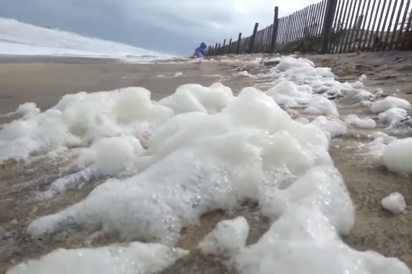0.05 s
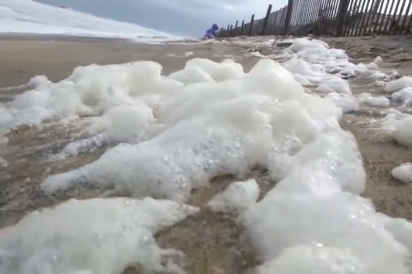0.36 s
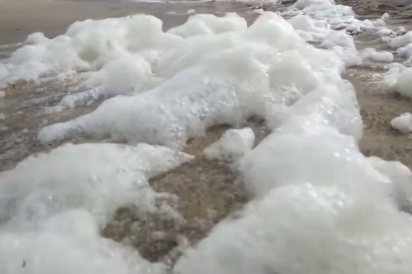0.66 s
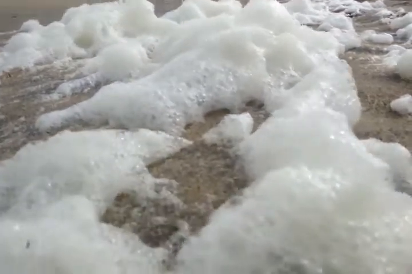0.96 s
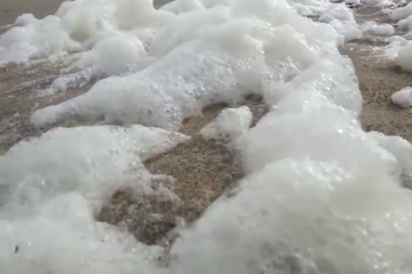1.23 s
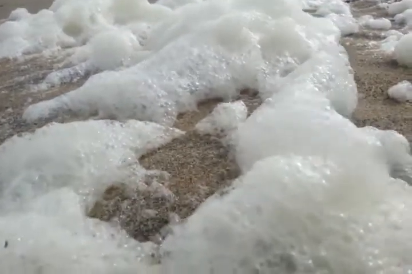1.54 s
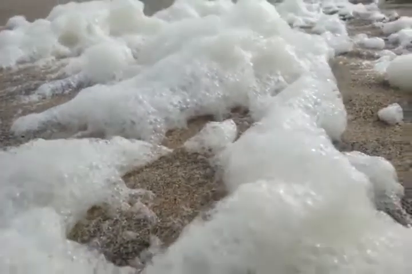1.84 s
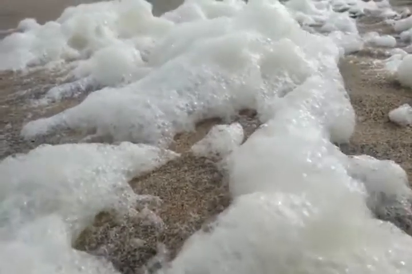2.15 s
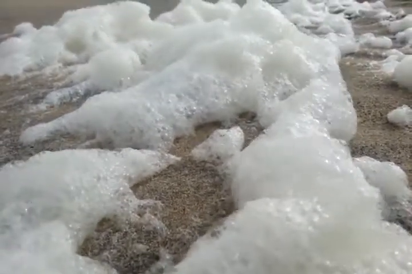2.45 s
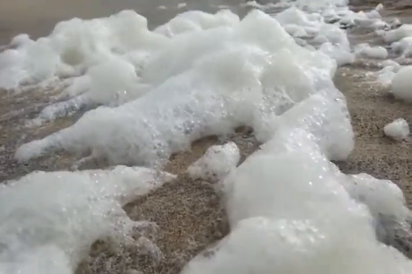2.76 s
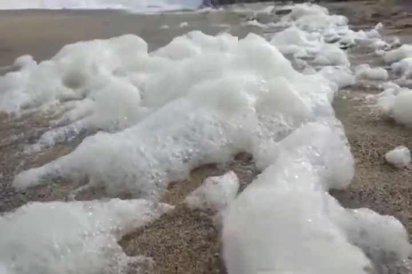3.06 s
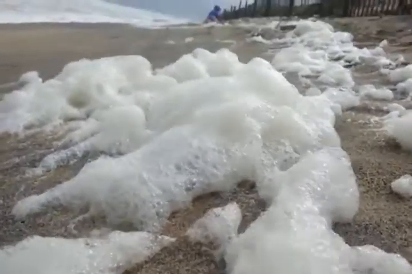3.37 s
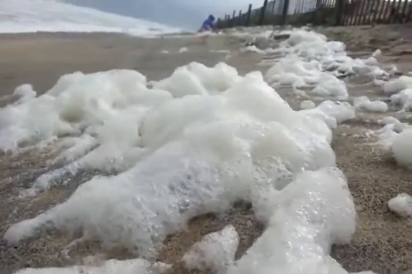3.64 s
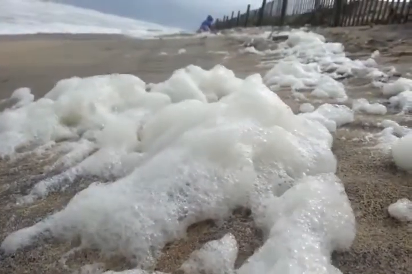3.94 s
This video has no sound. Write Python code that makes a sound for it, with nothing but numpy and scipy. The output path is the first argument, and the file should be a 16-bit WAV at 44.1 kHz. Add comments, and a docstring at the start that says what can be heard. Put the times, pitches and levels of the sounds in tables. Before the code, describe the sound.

Strong wind roars and thumps against the microphone while surf hisses faintly in the background.

```python
"""On an open beach, gusty wind buffets the two microphone ports of a camera held low over sea foam.
Eddies roar at each port, louder and higher the faster they pass. Sharp blasts slap and crackle,
large eddies thump the right port, and the hardest blasts overload the recorder.
Behind them the hiss of the surf swells and fades, ringing in the ports near 4.5 kHz."""
import sys
import numpy as np
from scipy import signal
from scipy.fft import rfft, irfft, next_fast_len
from scipy.io import wavfile
from scipy.ndimage import map_coordinates

SR = 44100
rng = np.random.default_rng(int(sys.argv[2]) if len(sys.argv) > 2 else 0)


def transcribe(u):
    """Save the signal u as a 16-bit wav file named by the first command-line argument.

    u: samples, shape (n,) or (channels, n), limited to [-1, 1]; the rate is SR.
    q: integer samples, one column per channel.
    """
    v = np.clip(np.atleast_2d(u).T, -1, 1)
    q = np.round(v * 32767).astype(np.int16)
    wavfile.write(sys.argv[1], SR, q)


N = 176400
LEFT, RIGHT = 0, 1

# Sharp blasts of wind. Each row: time in seconds, port, relative strength, half width in seconds.
BLASTS = [(.009, 0, 0.38, .002), (.024, 0, .6, .003), (0.041, 0, 0.67, .008), (.118, 0, 1.14, 0.0041),
          (.175, 0, 0.66, 0.0019), (0.206, 1, 0.56, 0.0021), (.232, 0, 0.66, 0.0037),
          (.24, 0, 0.99, 0.0039), (.252, 0, 0.65, 0.0021), (.287, 0, 0.88, .002),
          (.292, 0, 0.6504, 0.004026), (.331, 0, 0.81, .008), (.338, 0, 0.94, 0.003007),
          (.392, 0, 0.59, .01), (.431, 0, 0.84, 0.0032), (.439, 0, 0.56, 0.00308), (.515, 0, 0.48, .003),
          (.54, 0, .9, .004), (0.595, 0, 0.48, 0.0033), (.609, 0, 0.78, 0.0041), (.678, 1, 0.74, 0.0029),
          (.694, 0, 0.78, .003), (.709, 0, 0.52, 0.0042), (.761, 0, 0.68, 0.0055), (.793, 0, .6, .005),
          (.805, 1, 0.49, 0.0018), (.879, 1, 0.46, .003), (.931, 0, 0.63, 0.0041), (.937, 1, .55, 0.0019),
          (.952, 0, 0.69, 0.0044), (1.088, 1, 0.54, 0.0028), (1.117, 0, 0.67, 0.0032),
          (1.142, 0, .85, 0.0051), (1.251, 0, 0.48, 0.0028), (1.265, 0, 0.79, 0.0042),
          (1.361, 1, 0.66, 0.0019), (1.489, 1, 0.56, 0.0031), (1.571, 0, 0.57, 0.0032),
          (1.608, 1, 1.03, .004), (1.646, 1, 0.66, 0.0029), (1.719, 1, 0.42, .003),
          (1.822, 0, 0.54, 0.0029), (1.828, 1, 0.91, 0.0031), (1.893, 1, 0.6, 0.0049),
          (1.921, 1, 0.49, 0.0034), (2.146, 1, 0.52, 0.0027), (2.166, 1, 0.57, 0.0035),
          (2.23, 1, .88, 0.001999), (2.237, 1, .7, 0.0018), (2.2705, 1, 1.19, 0.0012),
          (2.336, 1, .8, 0.0018), (2.4, 1, 0.61, .003), (2.466, 1, 0.51, 0.0041), (2.682, 1, 0.49, .003),
          (2.704, 1, 0.99, 0.0049), (2.775, 1, 0.7, 0.0038), (2.902, 1, 0.87, 0.0031),
          (2.937, 0, 0.78, .003), (2.967, 0, 0.44, 0.0082), (2.994, 1, 0.72, 0.0019),
          (3.043, 0, .4, 0.0051), (3.061, 0, 0.439, 0.0039), (3.082, 0, 0.42, .004),
          (3.119, 0, .55, 0.0059), (3.163, 0, .45, .006), (3.182, 0, 0.48, 0.0042),
          (3.215, 0, 0.39, 0.0048), (3.278, 1, 0.69, .003), (3.284, 0, 0.43, 0.0032),
          (3.379, 0, 0.38, .003), (3.646, 1, 0.58, 0.0038), (3.816, 1, .45, 0.0029)]


def buffet(port):
    """Eddies sweep past one port: faster air is louder and shifts the roar upwards."""
    # The air stream at each port. Each row: time in seconds, level in dB, relative speed.
    left_air = [(0, -14.5, 1.415), (.18, -13.5, 1.186), (.3, -14, 1.403), (.7, -10.5, 1.3),
                (.87, -13.5, 1.09), (1.15, -13, 1.09), (1.45, -14.5, .93), (1.75, -12, 1),
                (2.05, -16.5, 0.78), (2.33, -15, 0.9), (2.42, -22.5, 0.89), (2.52, -17.5, 0.74),
                (2.67, -19, 0.8), (2.76, -14, 1.14), (3, -13.5, 1.314), (3.17, -10, 1.306), (3.3, -15, 1.1),
                (3.7, -13, 0.71), (3.87, -23.5, 0.7), (4, -13.5, 0.79)]
    right_air = [(0, -11.5, 0.9), (.45, -12, 0.88), (.72, -10.5, 1.12), (1.05, -13.5, 1.097),
                 (1.36, -9.5, .96), (1.62, -11.5, 1.034), (1.75, -10.5, 0.74), (1.85, -10, 0.88),
                 (2.22, -10, .94), (2.44, -10, 0.89), (2.52, -9, .75), (2.7, -10, 1.07), (3, -10.5, 1.08),
                 (3.35, -11.5, 0.96), (3.56, -10.5, 0.71), (3.66, -9.3, .76), (3.74, -9.5, 0.71),
                 (3.82, -7, .7), (4, -10.5, 0.59)]
    # Brief lulls. Each row: time in seconds, port, depth in dB.
    lulls = [(0.081, 0, 9), (0.08, 1, 6), (.209, 0, 7), (.527, 0, 7), (.609, 1, 6), (.729, 0, 9),
             (.83, 1, 9), (.856, 0, 6), (.896, 1, 7), (1.089, 0, 6), (1.163, 0, 7), (1.215, 0, 7),
             (1.219, 1, 8), (1.275, 1, 13), (1.416, 0, 8), (1.472, 1, 12), (1.508, 1, 6), (1.526, 0, 6),
             (1.67, 1, 7), (1.705, 1, 11), (1.763, 1, 8), (1.8, 0, 11), (2.152, 0, 7), (2.184, 1, 8),
             (2.251, 1, 8), (2.29, 1, 7), (2.426, 0, 6), (2.447, 1, 14), (2.573, 1, 6), (2.654, 1, 7),
             (2.851, 1, 6), (2.919, 0, 6), (3.19, 1, 6), (3.264, 0, 11), (3.557, 1, 8), (3.612, 0, 7),
             (3.684, 1, 4.5), (3.965, 1, 11.5)]
    # Turbulence, slow to fast. Each row: knots per second, level swing in dB, speed swing in octaves.
    turbulence = [(24.03, 0.53, .04), (70.03, 2.28, .13), (240.4, 2, .19), (899.2, 2, .2)]
    # The roar of the eddies at unit speed. Each row: frequency in Hz, relative level in dB.
    eddy_spectrum = [(20, -17.5), (100, -1), (250, 0), (450, -1), (700, -6), (1000, -12.5), (1500, -24),
                     (2200, -35), (3500, -57.5), (6000, -63), (12000, -94)]
    # The tone of each port, left then right. Each row: frequency in Hz, gain in dB.
    port_responses = [
        [(20, -33), (40, -17), (70, -5), (110, -4.5), (160, 1), (230, 2.5), (500, -1.5), (1400, -2), (2200, 0),
         (3200, -2), (4500, -11), (6000, -13), (14000, -6)],
        [(20, -36), (40, -25), (70, -12.5), (110, -5.5), (160, -1), (230, 0.48), (500, 0), (900, -1),
         (1400, -3.5), (2200, -5), (4500, -2), (6000, -3), (14000, -15)],
    ]
    blast_db, blast_octaves = 4, (.5, .55)  # rise in level; rise in speed, left and right
    puff_db, puff_octaves = 4.5, .28
    lull_half_width_s = .009

    level_db, speed = curves(left_air if port == LEFT else right_air)
    blast = bumps(BLASTS, port)
    lull_db = bumps([(*lull, lull_half_width_s) for lull in lulls], port)
    puff = puffs()
    level_db = level_db + blast_db * blast + puff_db * puff - lull_db
    octaves = blast_octaves[port] * blast + puff_octaves * puff
    unsteadiness = np.clip(1 - .7 * blast, 0, 1)  # a full blast sweeps most turbulence away
    for rate, swing_db, swing_octaves in turbulence:
        swirl = 2 * np.tanh(wobble(rate) / 2) * unsteadiness
        level_db = level_db + swing_db * swirl
        octaves = octaves + swing_octaves * swirl
    speed = speed * 2 ** octaves
    eddies = unit(coloured(rng.standard_normal(2 * N), eddy_spectrum))
    travelled = np.cumsum(speed)
    roar = amp(level_db) * map_coordinates(eddies, [travelled], mode="wrap")
    return coloured(roar + slaps(port), port_responses[port]) + crackle(speed, blast, port)


def puffs(per_second=26, half_width_s=.0015):
    """Small blasts arrive at random, each with its own strength: a control curve from 0 to 1."""
    chance, strengths = rng.random((200, 2)).T
    times = np.cumsum(-np.log(1 - chance)) / per_second
    hits = np.bincount((times * SR).astype(int), strengths, N)[:N]
    t = np.arange(-SR // 20, SR // 20) / SR
    swell = np.exp(-.5 * (t / half_width_s) ** 2)
    return np.tanh(signal.fftconvolve(hits, swell, mode="same"))


def slaps(port, level_db=3.5, typical_half_width_s=.00027):
    """The core of a blast crosses the port as one quick push and pull."""
    t = np.arange(N) / SR
    out = np.zeros(N)
    for at, side, strength, _ in BLASTS:
        if side == port:
            offset = (t - at) / (typical_half_width_s * rng.uniform(.59, 1.33))
            push_pull = offset * bell(offset) * np.exp(.5)  # peaks at 1
            out += rng.choice([-1, 1]) * strength * push_pull
    return amp(level_db) * out


def crackle(speed, blast, port):
    """Fast air tears at the port's edge in spiky grains: a rasp in the gusts, a crack in each blast."""
    # The finest eddies breaking up. Each row: frequency in Hz, relative level in dB.
    grain_spectrum = [(400, -10), (1000, 3), (1800, 2.5), (2600, 1), (3500, -6), (4700, -11.5), (6000, -24),
                      (10000, -32.5), (14500, -46)]
    rasp_db, crack_db = (-26.5, -33), (-18, -20)  # each left, right
    onset_speed, onset_steepness = 1.345, 10.6
    noise = rng.standard_normal(N)
    grains = unit(coloured(noise * np.abs(noise), grain_spectrum))
    rasp = amp(rasp_db[port]) / (1 + (onset_speed / speed) ** onset_steepness)
    crack = amp(crack_db[port]) * np.abs(blast) ** 1.79
    return grains * np.hypot(rasp, crack)


def thumps(typical_hz=267.5, half_width_s=.006):
    """A large eddy rocks the port for a few slow cycles."""
    # Large, slow eddies. Each row: time in seconds, peak level in dB.
    large_eddies = [(1.335, -4.5), (2.625, -4.5), (3.818, 0.5), (3.838, -2.5)]
    out = np.zeros(N)
    for at, peak_db in large_eddies:
        t = np.arange(N) / SR - at
        hz = typical_hz * rng.uniform(.75, 1.19)
        swing = np.sin(2 * np.pi * (hz * t + rng.random()))
        out += amp(peak_db) * swing * bell(t / half_width_s)
    return out


def surf():
    """Foaming water hisses as it washes up the sand and drains."""
    # The swells of the surf. Each row: time in seconds, relative level in dB.
    swells = [(0, -53), (.4, -52.5), (.87, -53.5), (1.21, -48.5), (1.55, -48.3), (1.95, -46), (2.37, -46.5),
              (2.6, -41.5), (2.84, -52), (3.15, -52.5), (3.44, -48.5), (3.58, -42.5), (3.77, -41.5),
              (4, -41)]
    # The colour of the hiss on each side. Each row: frequency in Hz, relative level in dB.
    left_spectrum = [(300, 2), (1200, -2.5), (2000, 3.5), (3200, -3), (4050, -2), (4750, -1), (5600, -10.5),
                     (8000, -13), (10500, -16), (12000, -25.5), (14500, -33)]
    right_spectrum = [(300, 3), (1200, -7.5), (2200, -1), (3200, -10), (4100, -7.5), (4700, -5), (5400, -6),
                      (7500, -8.5), (10000, -17), (12000, -30), (14500, -38)]
    return np.array([hiss(swells, left_spectrum), hiss(swells, right_spectrum)])


def port_ring():
    """Surf hiss rings in the microphone ports near 4.5 kHz, alike on both sides."""
    # The swells of the ringing. Each row: time in seconds, level in dB.
    port_ring_swells = [(0, -56.5), (1.5, -61), (1.85, -51), (2.35, -55), (2.62, -43), (2.85, -56),
                        (3.42, -54), (3.59, -43.5), (3.69, -52), (3.79, -41), (3.92, -45.5), (4, -38)]
    # The resonance of the ports. Each row: frequency in Hz, relative level in dB.
    port_ring_spectrum = [(2500, -60), (3500, -18), (4150, 3), (4700, 0.5), (5400, -18), (7500, -62)]
    return hiss(port_ring_swells, port_ring_spectrum)


def hiss(swells, spectrum, flicker_db=1, flicker_rate=24.98):
    """Coloured noise that flickers slightly as it swells and fades."""
    level_db, = curves(swells)
    envelope = amp(level_db + flicker_db * wobble(flicker_rate))
    return envelope * unit(coloured(rng.standard_normal(N), spectrum))


def amp(db):
    """Decibels to gain."""
    return 10 ** (np.asarray(db) / 20)


def unit(x):
    """Scale to rms 1."""
    return x / np.sqrt(np.mean(x ** 2) + 1e-20)


def curves(rows):
    """One value per sample for each column after the time."""
    times, *columns = np.transpose(rows)
    return [np.interp(np.arange(N) / SR, times, column) for column in columns]


def wobble(rate):
    """A smooth random curve, rate knots a second."""
    knots = rng.standard_normal(4096)
    return map_coordinates(knots, [np.arange(N) * rate / SR], mode="wrap")


def coloured(x, points):
    """Equalise x through (Hz, dB) points on a log frequency axis."""
    size = next_fast_len(len(x) + 8192)
    hz, db = np.transpose(points)
    bin_hz = np.fft.rfftfreq(size, 1 / SR)
    gain = amp(np.interp(np.log(bin_hz + 1), np.log(hz + 1), db))
    return irfft(rfft(x, size) * gain, size)[:len(x)]


def bell(offset):
    """A bell curve; offset counts half widths from its peak."""
    return np.exp(-.5 * np.minimum(offset ** 2, 100))


def bumps(rows, port):
    """Bell-shaped swells at one port, from rows of time, port, size and half width."""
    t = np.arange(N) / SR
    return sum(size * bell((t - at) / width) for at, side, size, width in rows if side == port)


def scene():
    """Each port has its own eddies and its own share of the surf."""
    wind_db, surf_db = (.5, 1), (10, 6.5)  # each left, right
    wind = np.array([buffet(LEFT), buffet(RIGHT) + thumps()])
    return amp(wind_db)[:, None] * wind + amp(surf_db)[:, None] * surf() + port_ring()


def record(dry):
    """The recorder clips at full scale and keeps nothing above its band limit."""
    hardness, top_hz = 60, 14800
    clipped = dry / (1 + np.abs(dry) ** hardness) ** (1 / hardness)
    size = next_fast_len(N + 8192)
    passband = np.fft.rfftfreq(size, 1 / SR) < top_hz
    return irfft(rfft(clipped, size) * passband, size)[:, :N]


dry = scene()
out = record(dry)
transcribe(out)
```